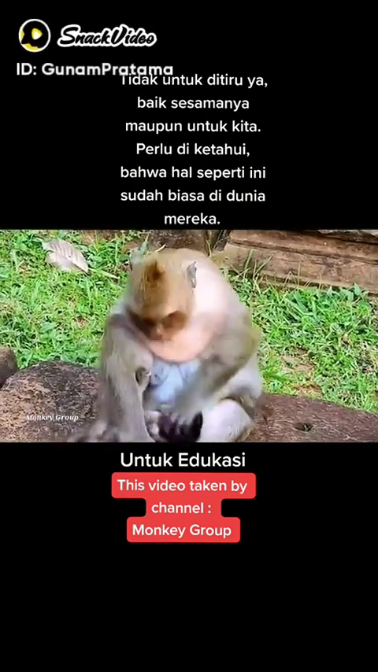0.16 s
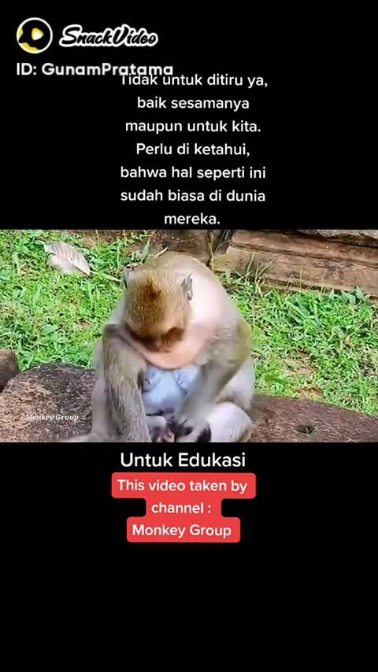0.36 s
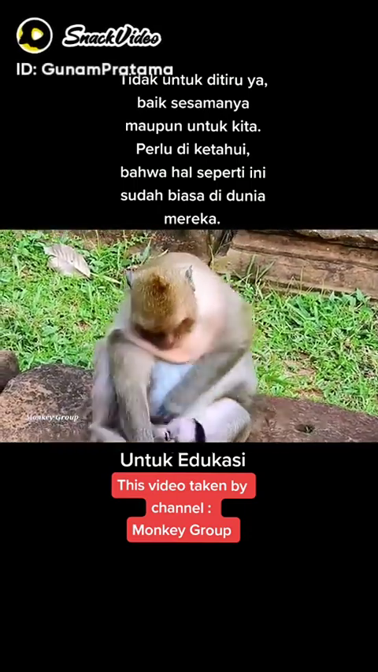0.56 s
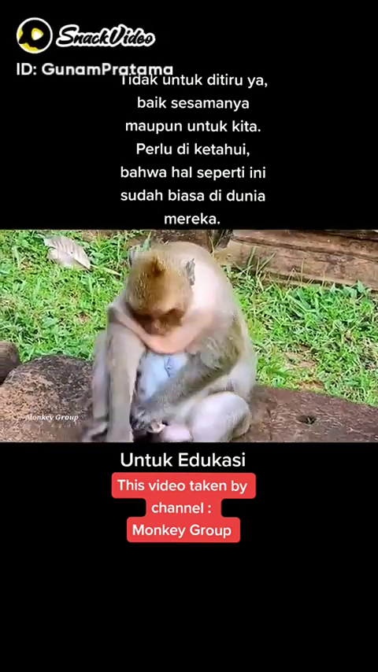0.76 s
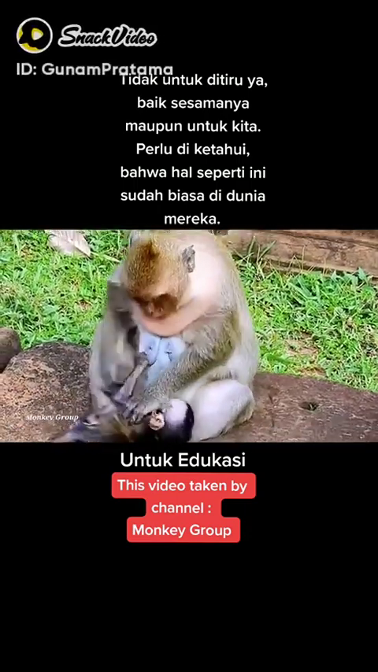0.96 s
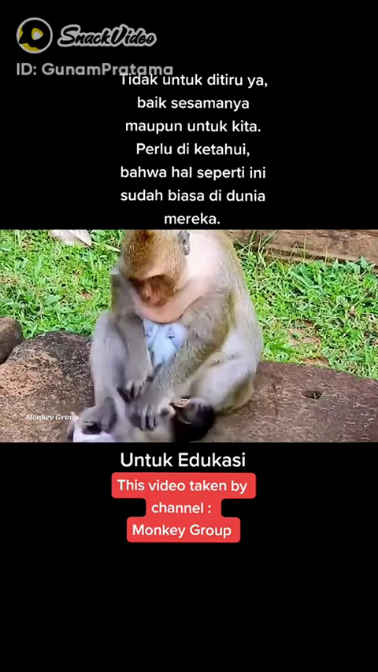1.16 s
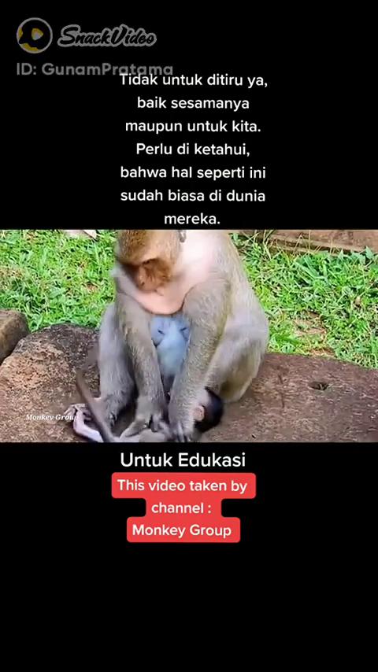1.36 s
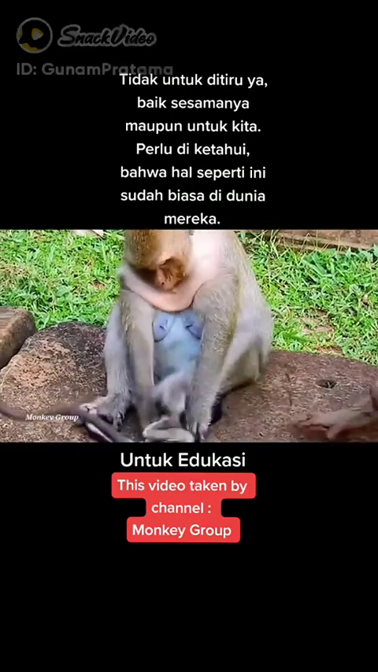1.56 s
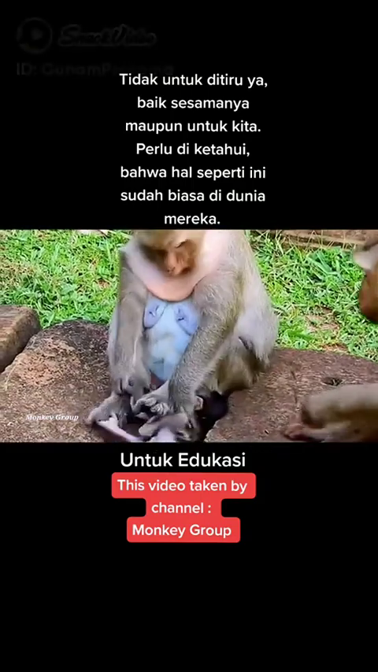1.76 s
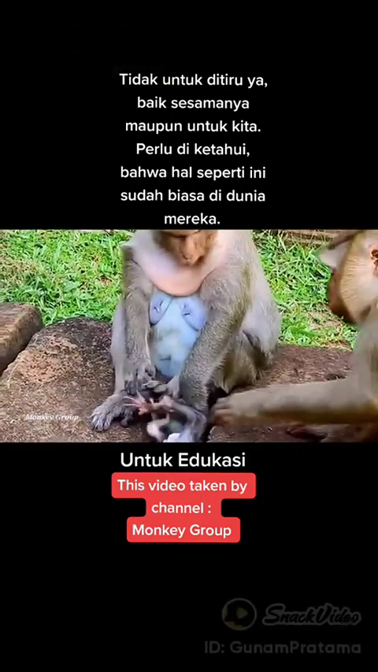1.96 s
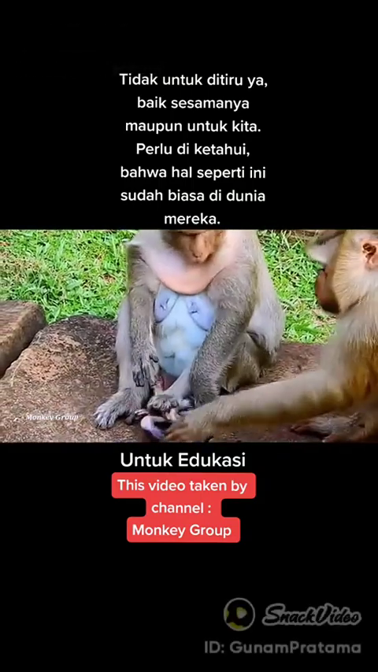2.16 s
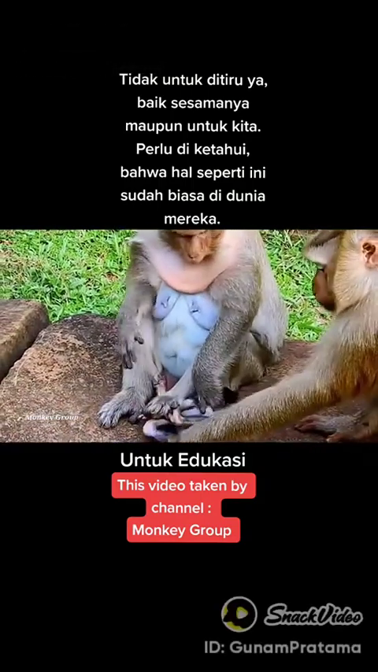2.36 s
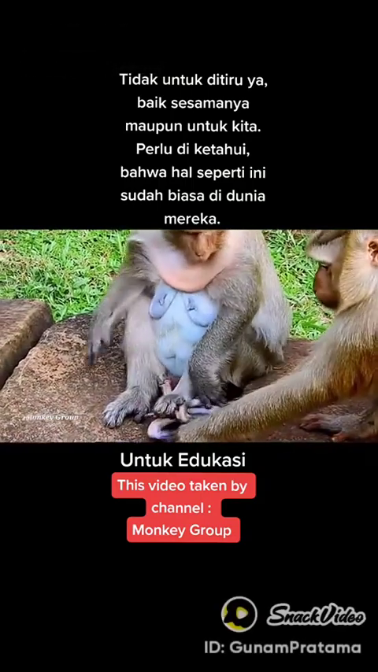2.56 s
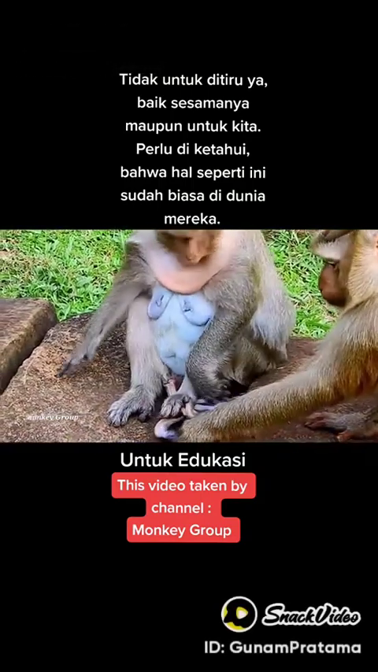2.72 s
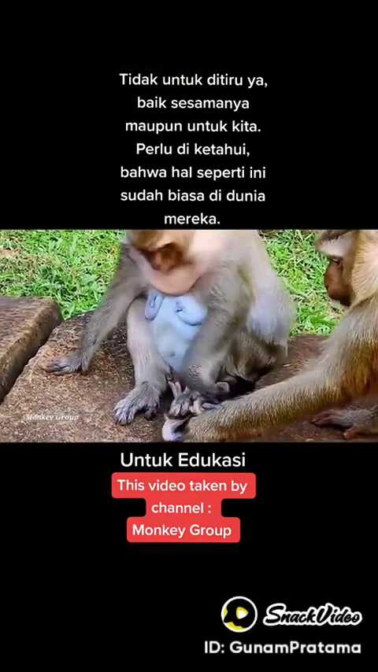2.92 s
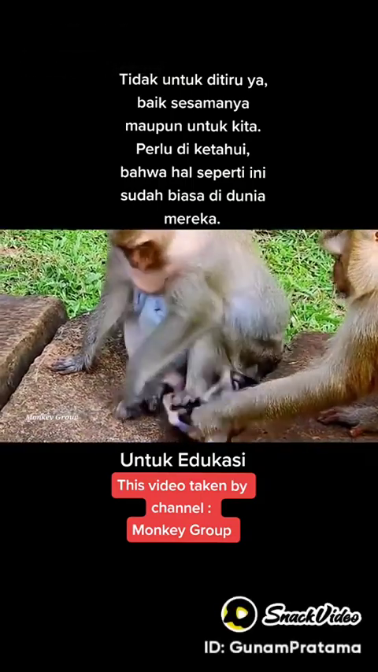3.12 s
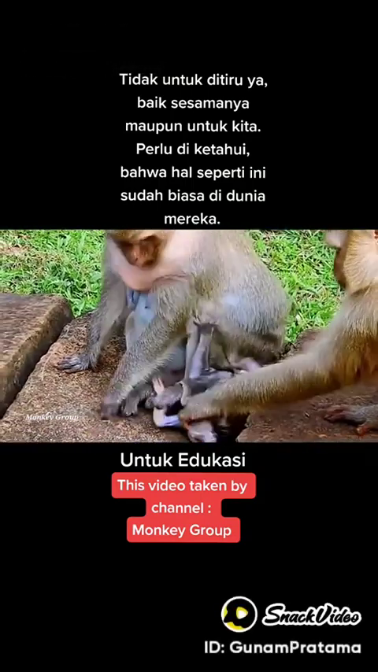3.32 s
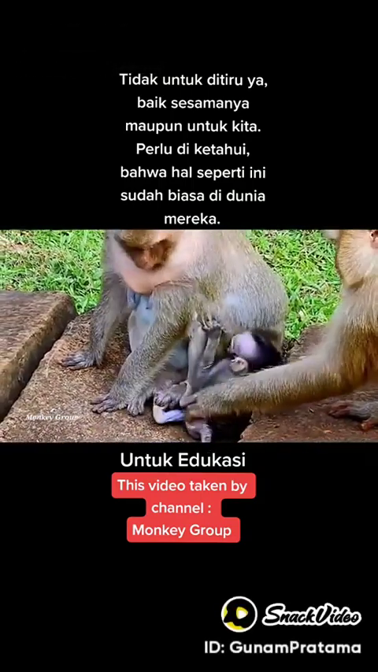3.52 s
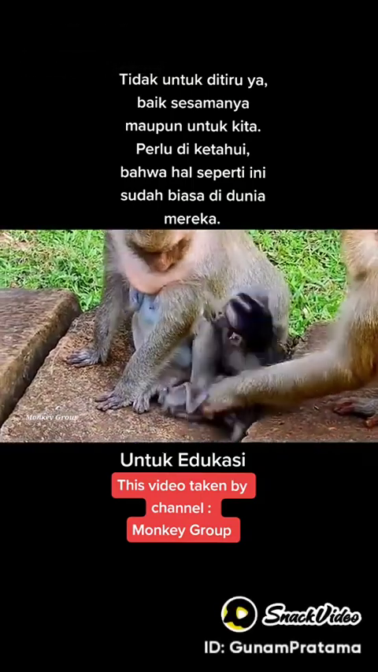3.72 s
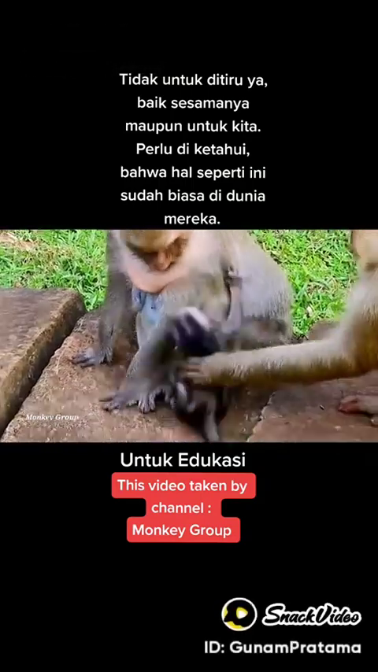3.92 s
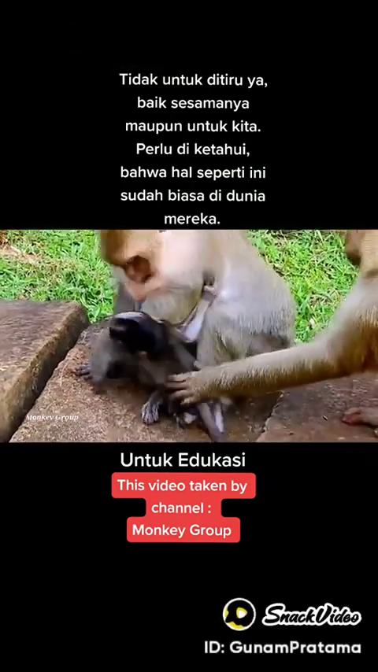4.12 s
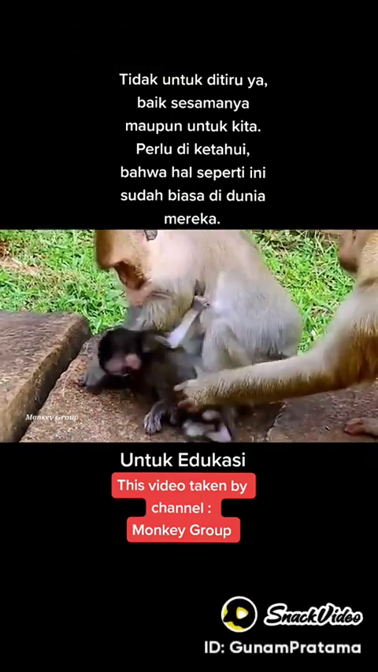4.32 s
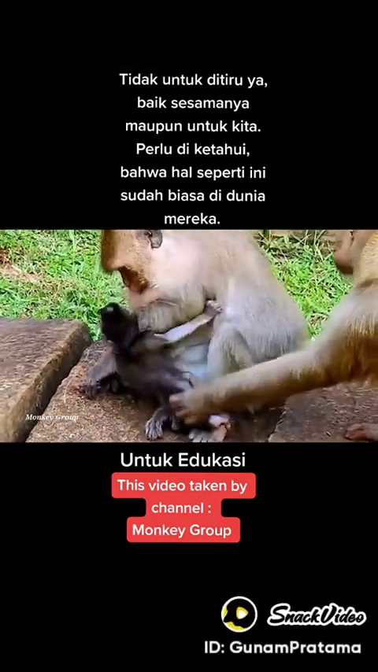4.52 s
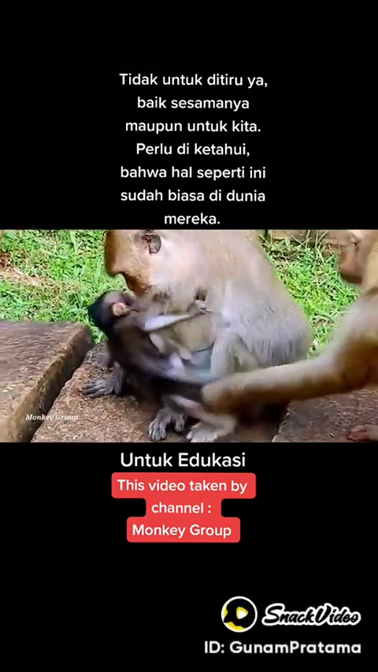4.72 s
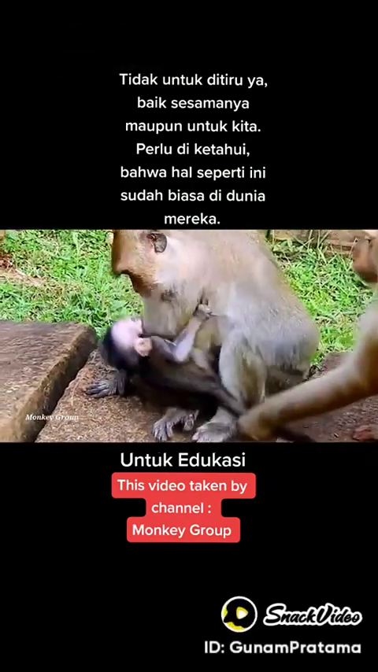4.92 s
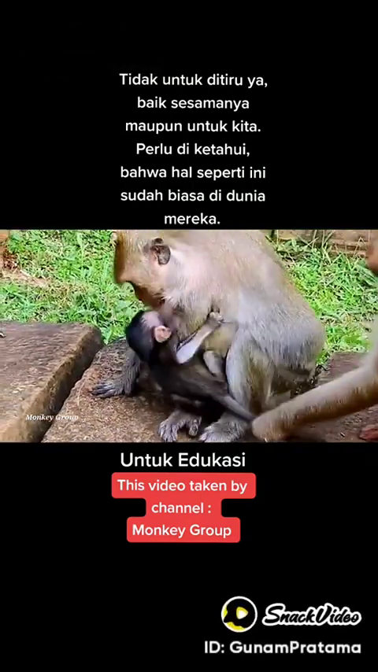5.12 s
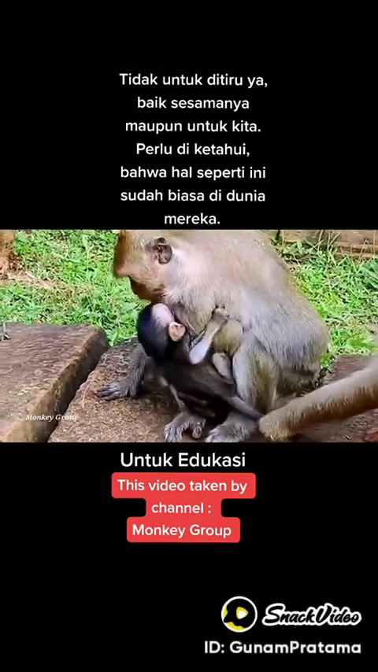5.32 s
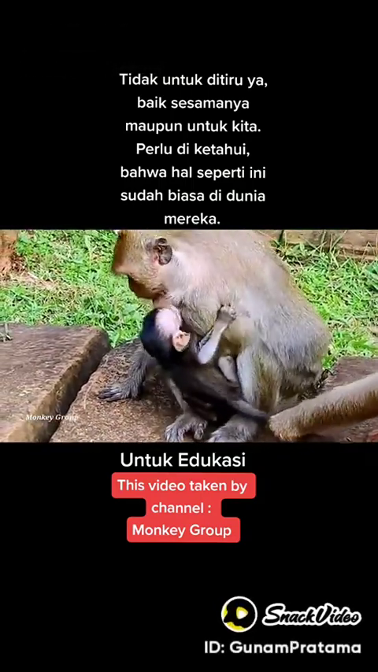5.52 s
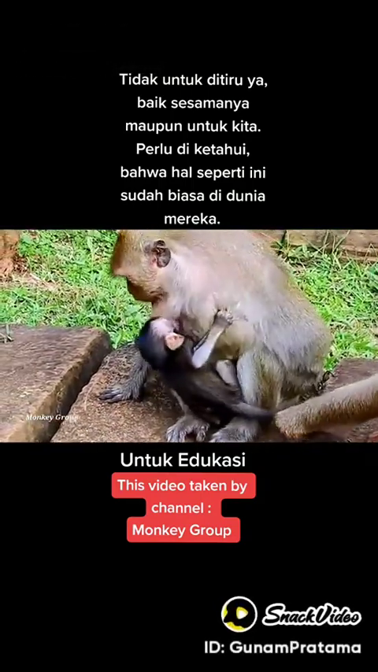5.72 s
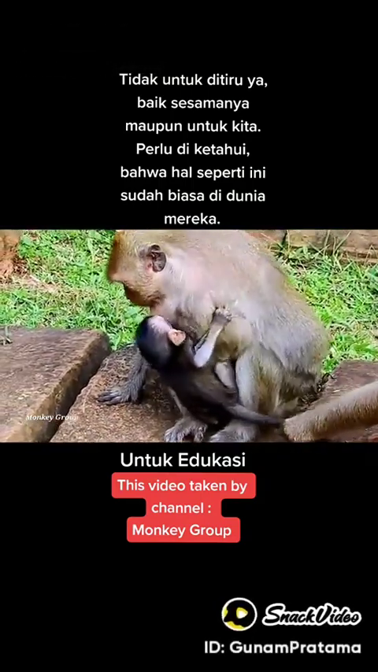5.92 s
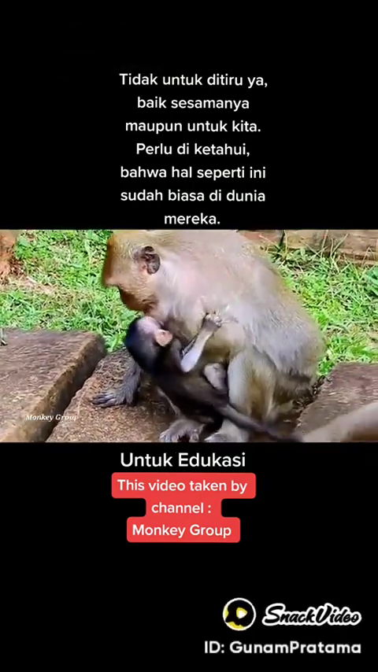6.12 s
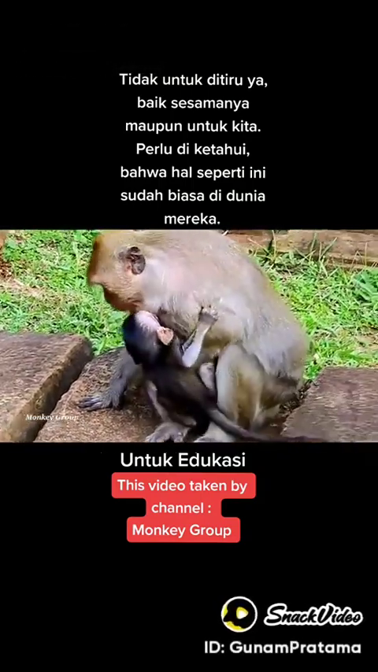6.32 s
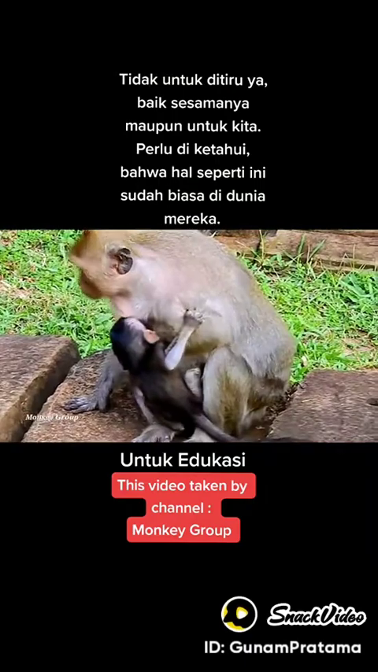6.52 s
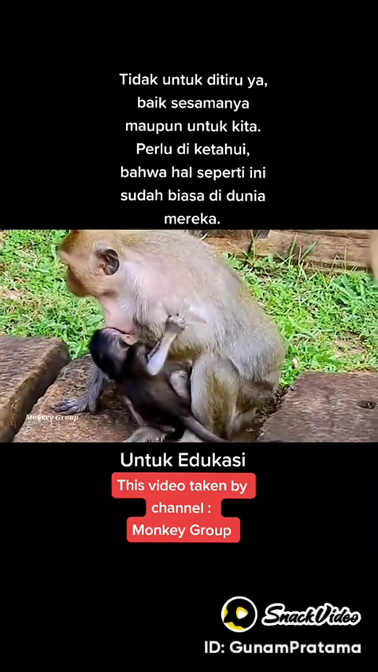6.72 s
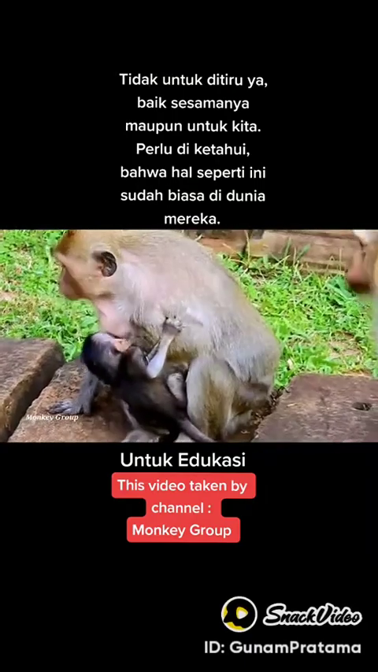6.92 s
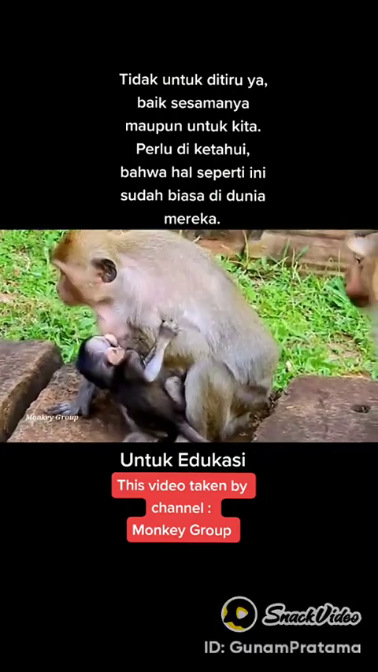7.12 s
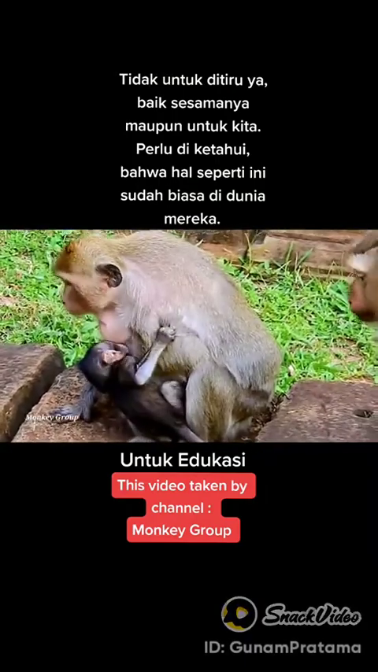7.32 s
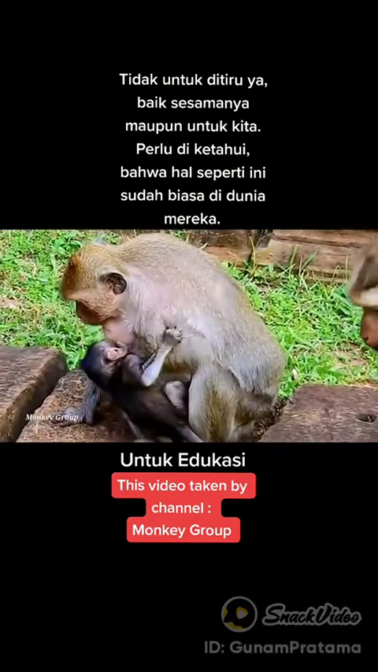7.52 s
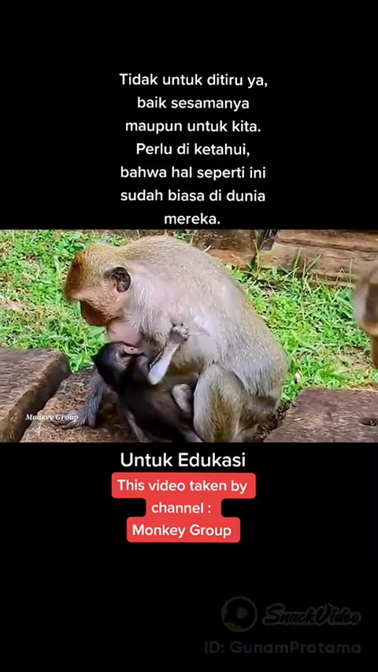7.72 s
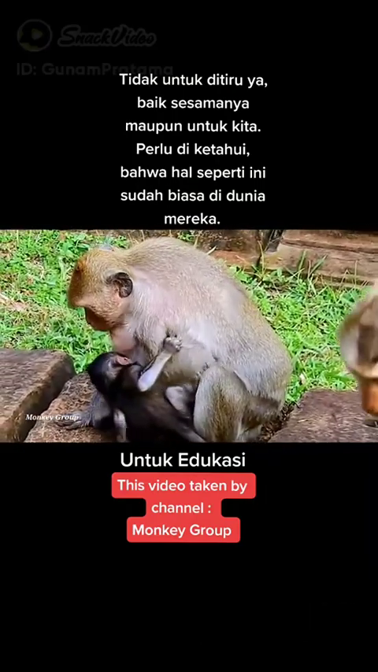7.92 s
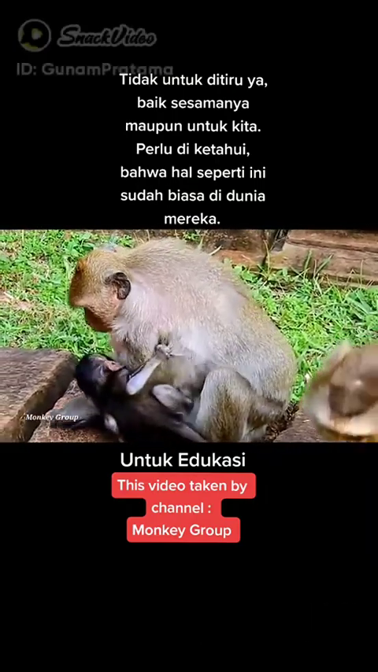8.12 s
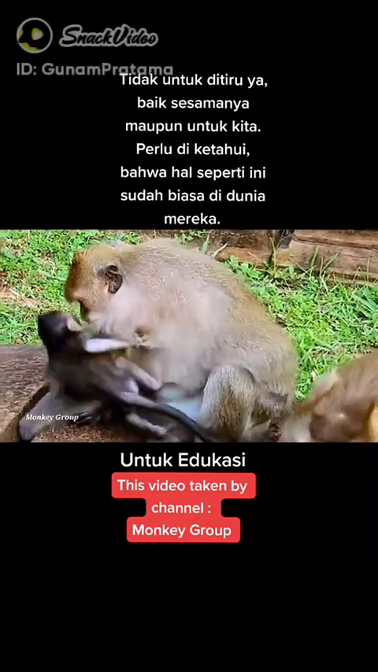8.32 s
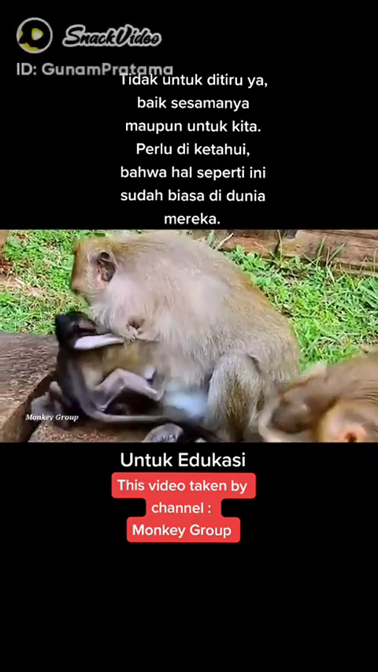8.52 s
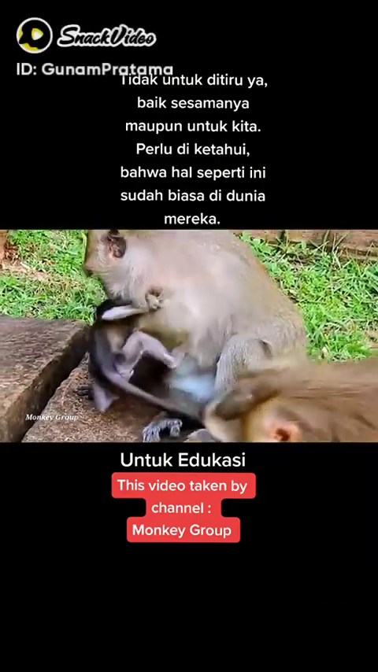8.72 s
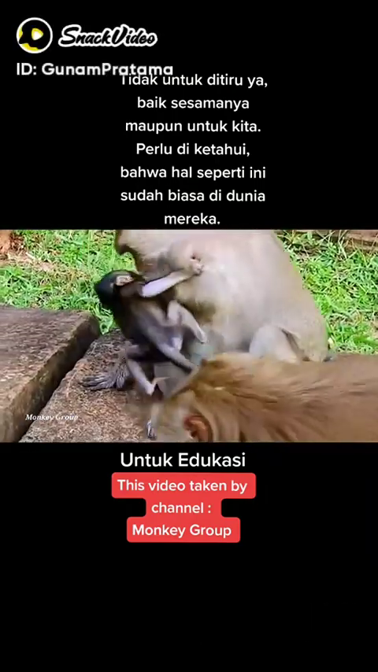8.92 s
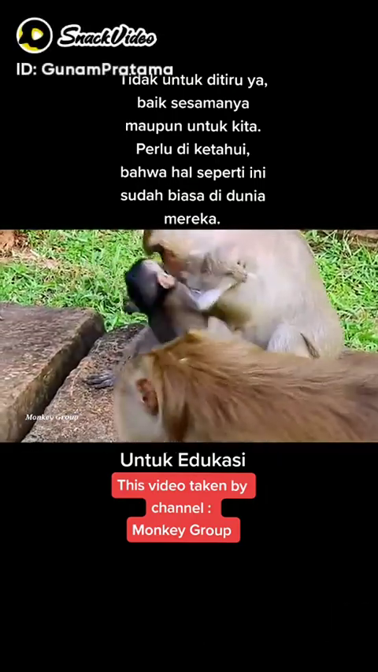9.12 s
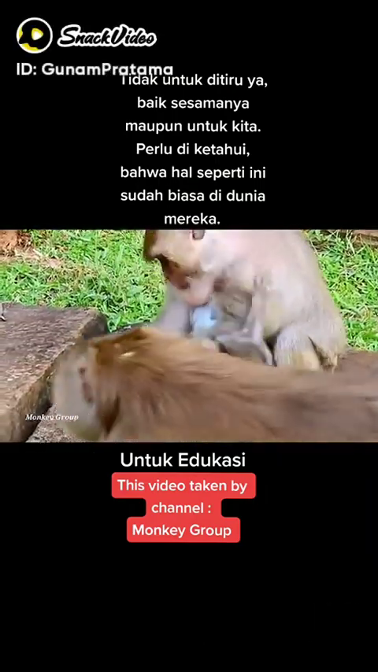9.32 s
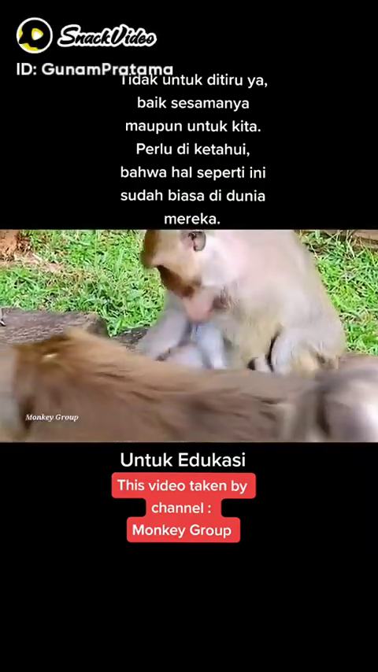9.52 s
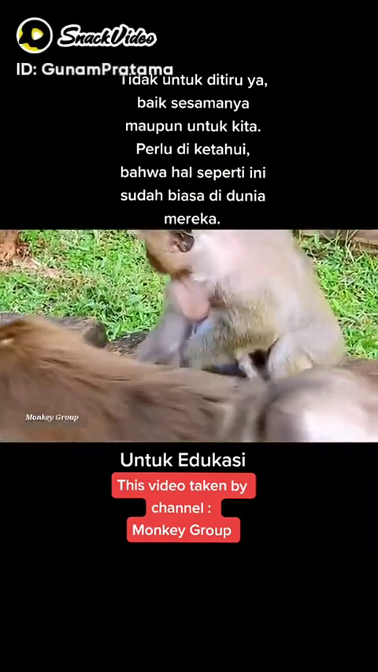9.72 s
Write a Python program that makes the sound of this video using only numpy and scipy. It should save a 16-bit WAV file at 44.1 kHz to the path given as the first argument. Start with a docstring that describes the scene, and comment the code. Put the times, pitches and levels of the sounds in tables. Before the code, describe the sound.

Very high, strained squeals of a distressed infant monkey burst out, subside into small yelps and coos, then return harshly over quiet outdoor rumble.

```python
"""A stone terrace outdoors: a baby monkey, held down by an adult, screams in bouts close to the microphone.
Its voice is one very high whistle that smears into sidebands and breaks into bursts of noise as it strains.
Short shrieks, lower undertones and faint blurred tones surround the screams; between bouts it yelps and coos.
The adult's grunts, two short broadband knocks and faint shuffles are swells and blows shaped by fixed spectra.
Decaying noise makes the echo of the stone, and fur rubs over a quiet outdoor rumble."""
import sys
import numpy as np
from scipy import signal
from scipy.fft import rfft, irfft, next_fast_len
from scipy.io import wavfile
from scipy.ndimage import uniform_filter1d, minimum_filter1d

SR = 44100
rng = np.random.default_rng(int(sys.argv[2]) if len(sys.argv) > 2 else 0)


def generate_wav(signal):
    """Clip the signal to [-1, 1] and save it as 16-bit WAV at the path in sys.argv[1]."""
    frames = np.transpose(np.atleast_2d(signal))
    scaled = np.clip(frames, -1, 1) * 32767
    pcm = np.round(scaled).astype(np.int16)
    wavfile.write(sys.argv[1], SR, pcm)


N = 434826
TIME = np.arange(N) / SR

# Long screams of the baby, close up. Each row: mouth hiss in dB, low rasp in dB relative to the voice,
# and a curve of effort whose points give time in seconds, pitch in Hz, level in dB, roughness (held to 0.13-1).
SCREAMS = [ (-43, -41, [(.18, 5200, -17, .85), (.21, 5500, -24, .85), (.24, 6150, -16, .65),
           (.29, 7000, -16.5, .85), (.325, 6100, -12.5, .65), (.36, 7020, -21, .9), (.405, 6500, -11, .85),
           (.445, 5200, -13, .55), (.475, 6058, -24, .85), (.572, 4720, -22, .45), (.602, 5030, -8.5, .75),
           (.635, 5730, -28.5, .95), (.685, 6700, -21.5, .88), (.735, 5250, -27.5, .55),
           (.785, 5510, -27, .55)]), (-48.5, -40, [(.815, 4500, -40.5, .7), (.88, 4170, -28.5, .3),
           (.938, 4350, -19, .6)]), (-53, -35.5, [(1.155, 4397, -30, .5), (1.195, 5007, -16, .15),
           (1.25, 5650, -18, .55), (1.372, 6150, -20, .45), (1.397, 5793, -29, .65), (1.41, 5450, -10, 0.2),
           (1.462, 5618, -28, .35), (1.494, 5819, -16.5, .45), (1.503, 5765, -17, .45),
           (1.535, 5457, -25, .4), (1.59, 5400, -18.5, .45), (1.65, 5460, -18.5, 0), (1.7, 5666, -18, .55),
           (1.775, 5600, -26.5, .72), (1.905, 5067, -20.5, 0.6)]), (-54.5, -24.5, [(1.945, 5167, -30, .45),
           (1.988, 4958, -18, .35), (2.04, 5100, -20.5, 0.5), (2.11, 5594, -19.5, 0.5),
           (2.225, 5410, -29.5, .85)]), (-52, -22, [(2.584, 6200, -14, .6), (2.612, 6000, -12, 1),
           (2.65, 5610, -12, .65), (2.708, 4484, -11.5, .65), (2.724, 5600, -7.5, .3),
           (2.734, 5980, -15.5, .7)]), (-43.5, -22.5, [(3.5, 4860, -32.5, 0.77), (3.532, 4834, -12.5, 0.61),
           (3.568, 3935, -18.5, 0.74), (3.608, 6090, -13.5, 1.1), (3.672, 5110, -8.5, 0.14),
           (3.685, 4440, -18, 0.8)]), (-48, -26.5, [(3.86, 5700, -45, .7), (3.905, 5600, -33.5, .55),
           (3.935, 5300, -48.5, .6), (3.965, 5040, -24, .45), (4.025, 5580, -44, .7), (4.07, 6200, -32, .6),
           (4.129, 5320, -24.5, .45), (4.136, 5450, -14.5, .2), (4.16, 5580, -16, .1),
           (4.208, 5140, -14.5, .15), (4.224, 5820, -19.5, 1), (4.255, 5900, -15.5, .75),
           (4.3, 4830, -20, 1), (4.325, 3235, -14, .75), (4.345, 3500, -22.5, .85)]),
           (-41, -31.5, [(4.585, 4950, -47, .1), (4.645, 5404, -37, .45), (4.68, 4060, -25, .7),
           (4.73, 3970, -11, .8), (4.77, 5700, -24.5, .98), (4.815, 4800, -9, .7), (4.84, 5050, -30.5, .8),
           (4.85, 4930, -10.5, .2), (4.875, 5330, -17, .15), (4.9, 5168, -13, .12), (4.922, 5450, -20, .15),
           (4.951, 5330, -26.5, .25), (5.023, 5186, -19.5, .2), (5.05, 4810, -23.5, .8)]),
           (-48, -21.5, [(8.385, 3554, -5, 0.52), (8.423, 4830, -10, 1.1), (8.439, 4260, -16, 0.53),
           (8.455, 6280, -19.5, 1.1), (8.598, 5710, -12.5, 0.89), (8.614, 5460, -10, 0.22),
           (8.645, 4730, -9, 0.8)]), (-56, -22, [(8.832, 3950, -13.5, 0.3), (8.852, 4198, -7.5, 0.4),
           (8.885, 5410, -13.5, .7), (8.91, 6400, -19, 1), (8.965, 6245, -15, 0.87),
           (9.035, 6000, -11.5, 0.5), (9.075, 4725, -11, 0.7), (9.107, 4550, -12, .7),
           (9.14, 3423, -17, 0.99)]), (-34, -26, [(9.418, 7100, -29, 0.4), (9.445, 3924, -31, 1),
           (9.486, 4300, -4.5, 0.3), (9.502, 4500, -28, 1), (9.518, 4323, -11, 0.7),
           (9.55, 4800, -24.5, .9)]), (-45, -28, [(9.578, 4950, -15.5, .35), (9.63, 5040, -19, 0.8),
           (9.655, 5100, -27.5, .85), (9.722, 5400, -24.5, .6), (9.85, 4760, -43.5, 0.5)])]
# Short shrieks, each one straight glide. Each row: start in seconds, length in seconds, start pitch in Hz,
# end pitch in Hz, level in dB, roughness (held to 0.13-1), mouth hiss in dB, low rasp in dB relative to the voice.
SHRIEKS = [(.029, 0.023, 5000, 5400, -13, 0.74, -52, -18), (.958, .007, 7010, 7700, -17, 0.6, -48.5, -36),
           (1.124, 0.014, 3450, 4300, -20, .98, -52.5, -33),
           (2.245, .028, 5700, 6055, -15.5, 1.2, -45.5, -19.5),
           (2.523, 0.015, 2900, 3904, -21.5, .4, -61, -7.5),
           (2.549, .016, 5850, 6360, -21.5, 1.23, -49.5, -13.5),
           (2.749, 0.017, 7550, 7420, -17, 0.2, -55.5, -13.5),
           (2.782, .046, 6060, 4940, -10.5, .45, -58, -29.5), (2.869, .03, 6060, 5360, -12, .6, -67, -24),
           (2.975, 0.006, 4440, 4160, -11.5, 0.38, -91, -24.5),
           (2.995, 0.0063, 5920, 5030, -25.5, 0.5, -77.5, -18.5),
           (3.338, 0.022, 5000, 4910, -13.5, 0.59, -46, -12.5),
           (3.356, 0.017, 4300, 4110, -6, 0.4, -40.5, -15),
           (3.431, 0.0043, 6400, 6400, -12, 0.39, -47, -11.5),
           (3.446, .034, 5550, 4900, -11, 0.8, -51.5, -23.5),
           (3.826, .008, 5150, 5120, -30, 0.55, -40, -22), (4.519, 0.046, 7700, 8290, -32, 0.3, -30.5, -40),
           (5.079, 0.0097, 3640, 3730, -13.5, 0.54, -51.5, -25),
           (7.738, .008, 6000, 5952, -65.5, .5, -84, -21.5),
           (9.366, 0.067, 6990, 6800, -41, .45, -47, -5.5)]
# A second, lower voice beside the whistle. Each row: start in seconds, length in seconds, start pitch in Hz,
# end pitch in Hz, level in dB before a common trim.
UNDERTONES = [(0.253, .1, 4127, 4040, -23), (2.548, .08, 4026, 3586, -26),
              (4.241, 0.088, 3683, 3317, -23.5), (4.687, 0.079, 3877, 4050, -19),
              (9.066, .065, 4030, 3258, -17.5), (9.428, 0.095, 3676, 3830, -21)]
# Faint blurred tones before and between the screams. Each row: start in seconds, length in seconds,
# start pitch in Hz, end pitch in Hz, start level in dB, end level in dB, blur in Hz.
BLURRED_TONES = [(0.002, 0.19, 5170, 5190, -34.5, -46.5, 970), (2.989, 0.35, 3250, 2730, -42, -45, 167.6),
                 (8.694, .12, 5390, 4974, -40, -36.5, 700)]
# Short yelps. Each row: start in seconds, length in seconds, start pitch in Hz, end pitch in Hz,
# level in dB before the final colouring, roughness (about 0-1), octave in dB relative to the tone.
YELPS = [(0.009, 0.016, 2381, 2150, -38, 0.3, -10), (2.236, 0.044, 2036, 1792, -35.5, 1.11, -11.5),
         (2.508, 0.042, 1610, 2558, -34.5, 0.43, -22.5), (3.247, 0.021, 1745, 1953, -34.5, 0.3, -24.5),
         (3.273, 0.012, 1997, 1470, -21, 0.06, -23.5), (3.839, 0.024, 2274, 1957, -44, 0.3, 2),
         (5.299, 0.023, 2202, 2444, -20, 0.09, -27), (5.312, 0.042, 3373, 3140, -23.5, 0.84, -21.5),
         (5.334, 0.0089, 2253, 2167, -19, 0, -12), (5.396, .027, 2585, 2015, -16, 0.4, -48.5),
         (5.758, 0.033, 1935, 1725, -25, 0.35, -63), (6.313, 0.019, 1445, 1380, -34.5, 0.06, -4.5),
         (8.218, 0.028, 2648, 2276, -21.5, 0.18, -26), (8.239, 0.023, 2191, 1868, -25, 0.51, 10)]
# Soft coos. Each row: start in seconds, length in seconds, start pitch in Hz, end pitch in Hz, level in dB.
COOS = [(6.996, 0.024, 1053, 1080, -53), (7.071, 0.11, 1166, 1408, -47.5), (7.183, 0.031, 1426, 1410, -40),
        (7.296, 0.015, 1475, 1547, -37.5)]
# The adult's low grunts. Each row: peak time in seconds, level in dB, rise and fall time in seconds.
GRUNTS = [(.728, -49.5, 0.042), (.962, -41, 0.012), (1.32, -48.5, 0.023), (1.61, -44, .024),
          (1.835, -33.5, 0.015), (2.262, -60, 0.014)]
# Short broadband knocks, perhaps the microphone being handled. Each row: time in seconds,
# height of the blow in dB before it is coloured.
KNOCKS = [(0.404, -29.5), (8.394, -16)]
# Faint shuffling on the stone. Each row: peak time in seconds, level in dB, rise and fall time in seconds.
SHUFFLES = [(3.018, -58, 0.0051), (4.45, -60, 0.033), (5.63, -60, 0.036), (7.5, -61, 0.027),
            (7.8, -63.5, 0.016), (9.5, -59, 0.12)]

# Spectra of the baby's throat, its open mouth, the rattle below the whistle and the rasp of its yelps.
# Each row: frequency in Hz, level in dB.
THROAT = [(500, -58), (1100, -44.5), (1600, -35.5), (2600, -28), (3100, -30.5), (3900, -4), (5000, -1.5),
          (6300, 7.5), (6750, -1.5), (7700, 5), (8300, -21.5), (9500, -36)]
MOUTH_HISS = [(7400, -35.5), (8200, -2.5), (9000, 0.5), (10200, 1.5), (10600, -18.5), (11200, -15.5),
              (11900, -5), (12300, -21), (14400, -11), (15500, -17)]
LOW_RASP = [(800, -37), (1400, -16.5), (2000, -6), (3000, -1), (3600, 8), (4300, -21.5)]
YELP_RASP = [(700, -26), (1500, -17), (2400, -4), (4000, 11), (5300, -14.5), (6400, 0.5), (7700, -8),
             (8600, -33)]
# Spectra of the adult's throat, the knock's colour, the shuffled stone and the outdoor air.
# Each row: frequency in Hz, level in dB.
GRUNT_THROAT = [(100, -15), (300, -22), (550, -12.5), (830, 1.5), (1100, -7), (1600, -10.5), (2500, -20.5),
                (5000, -64)]
KNOCK_COLOUR = [(30, -3), (150, -5), (800, 2), (1500, 10.5), (4000, -23), (12000, -16)]
SHUFFLE_BODY = [(200, -12), (600, -1.5), (1400, 5.5), (2500, -11.5), (6000, -21.5), (12000, -34)]
AIR = [(20, -34), (45, -18), (90, -2), (150, -1), (220, -12.5), (350, -20), (650, -22.5), (1200, -16.5),
       (2200, -23.5), (4500, -38), (7500, -33), (9000, -46.5), (15000, -48)]
# Colour of the whistle, of whole yelps, of rubbed fur and of the scatter's left-right difference.
# Each row: frequency in Hz, level in dB.
WHISTLE_COLOUR = [(1500, -13.0), (3000, -20), (3600, -6.5), (8000, 3), (9500, -17.5)]
YELP_COLOUR = [(700, -14.5), (1400, -8.5), (4400, -3.5), (5300, -16.0), (6200, 2), (7700, -3.5), (8800, -27)]
FUR = [(50, -4.5), (140, 12.0), (260, -5.0), (1200, 0), (3000, -20.0), (9000, -29)]
SCATTER_SIDE = [(300, -19), (2500, -35.5), (5000, -14), (9000, -16.5), (13000, -13.5)]
# How hard the animals struggle. Each row: time in seconds, struggle from 0 to 1.
STRUGGLE = [(0, 0.67), (1.4, 0.8), (1.9, 1), (2.3, 0.048), (4.4, 0.23), (6, 0.051), (7.6, 0.17), (8.6, 0.33), (9.8, 0.65)]
# The terrace's echo. Each row: band centre in Hz, time to fall by 60 dB in seconds, level in dB.
TERRACE = [(250, 0.21, -14.5), (700, 0.13, -2.5), (1500, 0.63, -14), (2850, 0.22, -9), (4400, 0.083, -9),
           (8700, 0.28, -12)]

ATTACK_S, RELEASE_S = 0.0023, .008  # time constants with which screams and shrieks open and die away
THROB_DB, THROB_HZ = 1.03, 44.8  # the breath pressure of a scream is unsteady
WANDER_HZ, WANDER_RATE_HZ = 68, 15  # and so is its pitch
# mouth hiss: dB per dB of voice over its usual level, dB more at full roughness, usual level in dB
HISS_FOLLOW, HISS_STRAIN_DB, USUAL_DB = .35, 19.5, -21
TOP_HZ = 15750  # upper edge of the recorder's passband


def screams(jitter_hz=170, quaver_hz=40, lurch_hz=480, flutter_db=6, burst_db=-1.0, smear_hz=620,
            smear_share=0.47, chaos_share=0.85, chaos_power=5.0, octave_db=-5, hiss_trim_db=-1):
    """Tiny vocal folds whistle; strain smears the whistle into sidebands, then into bursts that fill the throat."""
    hz, rough, voice_gain, hiss_gain, rasp_gain = effort()
    quaver = quaver_hz * walk(78)
    lurch = lurch_hz * rough ** 2 * walk(60)
    jitter = jitter_hz * rough * walk(420)
    phase = turn(hz + quaver + lurch + jitter)
    flutter = undb(flutter_db * rough * walk(130))
    flutter /= np.sqrt(uniform_filter1d(flutter ** 2, size=700))  # keeps the slower level even
    bursts = unit(undb(burst_db * walk(330)))

    # irregular beating of the folds throws sidebands that cling to the pitch
    sidebands = unit(walk(smear_hz) * np.sin(phase) + walk(smear_hz) * np.cos(phase))
    smear = smear_share * np.clip((rough / 0.64) ** 3.5, 0, 1)
    whistle = np.sqrt(2 * (1 - smear)) * flutter * np.sin(phase) + np.sqrt(smear) * sidebands
    whistle = colour(whistle, WHISTLE_COLOUR)
    chaos = chaos_share * rough ** chaos_power
    throat = bursts * patchy(THROAT, patch_db=8.5, patch_hz=44.6)
    voice = np.sqrt(1 - chaos) * whistle + np.sqrt(chaos) * throat

    # the open mouth lets out the octave together with rushing air
    octave = colour(flutter * np.sin(2 * phase), MOUTH_HISS) * undb(octave_db) * (1 - chaos)
    rush = undb(hiss_trim_db) * bursts * patchy(MOUTH_HISS, patch_db=11.5, patch_hz=18, count=14)
    # in the harshest screams the bursts also rattle the throat below the whistle
    rasp = bursts * noise(LOW_RASP)
    return voice_gain * voice + hiss_gain * (rush + octave) + rasp_gain * rasp


def effort():
    """Pitch, roughness and gains of voice, hiss and rasp; hiss and rasp grow with level and strain."""
    calls = [[(*point, hiss_db, rasp_db) for point in points] for hiss_db, rasp_db, points in SCREAMS]
    calls += [glide(*row) for row in SHRIEKS]
    envelope, hz, db, rough, hiss_db, rasp_db = play(calls, ATTACK_S, RELEASE_S)
    rough = np.clip(rough, .13, 1)
    hiss_db = hiss_db + HISS_FOLLOW * (db - USUAL_DB) + HISS_STRAIN_DB * rough
    pressure = envelope * undb(THROB_DB * walk(THROB_HZ))
    gains = pressure * undb([db, hiss_db, db + rasp_db])
    voice_gain, hiss_gain, rasp_gain = uniform_filter1d(gains, size=90)  # 2 ms, against clicks
    wandering_hz = hz + WANDER_HZ * walk(WANDER_RATE_HZ)
    return wandering_hz, rough, voice_gain, hiss_gain, rough * rasp_gain


def undertones(width_hz=300, trim_db=-1, attack_s=0.0047, release_s=0.011):
    """Under most strain the two folds part ways, and one buzzes at its own lower pitch."""
    envelope, hz, db = play([glide(*row) for row in UNDERTONES], attack_s, release_s)
    return envelope * undb(db + trim_db) * blurred(hz, width_hz)


def blurred_tones(attack_s=.008, release_s=.015):
    """Faint tones before and between the screams, each a band of noise around a gliding pitch."""
    out = 0
    for start, length, start_hz, end_hz, start_db, end_db, width_hz in BLURRED_TONES:
        call = [(start, start_hz, start_db), (start + length, end_hz, end_db)]
        envelope, hz, db = play([call], attack_s, release_s)
        out = out + envelope * undb(db) * blurred(hz, width_hz)
    return out


def yelps(jitter_hz=520, flutter_db=6, rasp_db=-3, edge_s=.004):
    """Short, low, hoarse notes: a tone, its octave and a rasp that grows with roughness."""
    out = np.zeros(N)
    wobble, flutter, rasp = walk(510), walk(260), noise(YELP_RASP)
    for start, length, start_hz, end_hz, db, rough, octave_db in YELPS:
        t = np.arange(int((length + edge_s) * SR)) / SR
        span = slice(int(start * SR), int(start * SR) + len(t))
        hz = np.interp(t, [0, length], [start_hz, end_hz])
        phase = turn(hz + jitter_hz * rough * wobble[span])
        tone = np.sin(phase) + undb(octave_db) * np.sin(2 * phase)
        tone = unit(tone * undb(flutter_db * rough * flutter[span]))
        hoarse = tone + undb(rasp_db) * rough ** 2 * rasp[span]
        edges = np.clip(np.minimum(t, t[-1] - t) / edge_s, 0, 1)
        out[span] += undb(db) * hoarse * edges
    return colour(out, YELP_COLOUR)


def coos(second_db=-15, third_db=-21, waver=0.013, attack_s=0.0064, release_s=0.0059):
    """Soft, mostly rising whimpers on a clean pitch; higher pitches carry weaker overtones."""
    envelope, hz, db = play([glide(*row) for row in COOS], attack_s, release_s)
    phase = turn(hz * (1 + waver * walk(98)))
    bright = undb(np.interp(hz, [1100, 1500], [7, -10]))
    overtones = undb(second_db) * np.sin(2 * phase) + undb(third_db) * np.sin(3 * phase)
    level = uniform_filter1d(envelope * undb(db), size=300)
    return level * np.sqrt(2) * (np.sin(phase) + bright * overtones)


def grunts():
    """Low swells of grainy noise through the adult's throat."""
    return puffs(GRUNTS, GRUNT_THROAT, grain_db=2, grain_hz=119.6)


def knocks(push_s=.0004, rattle_db=-25, rattle_s=.018):
    """Short broadband knocks: a sudden push and a weaker noisy rattle, both dying away, through one colour."""
    out = np.zeros(N)
    t = np.arange(SR // 5) / SR
    for at, db in KNOCKS:
        push = np.exp(-t / push_s)
        rattle = undb(rattle_db) * np.exp(-t / rattle_s) * rng.standard_normal(len(t))
        out[int(at * SR):int(at * SR) + len(t)] += undb(db) * (push + rattle)
    return colour(out, KNOCK_COLOUR)


def shuffles():
    """Faint swells of grainy noise as the stone is brushed."""
    return puffs(SHUFFLES, SHUFFLE_BODY, grain_db=-1.0, grain_hz=204.5)


def terrace(x, early_s=0.0065, near_db=-17, side_db=-11.5, far_db=-29, far_t60_s=0.24):
    """Nearby stone scatters the sound, the treble differently to each side; walls and trees add a faint tail."""
    t = np.arange(int(.8 * SR)) / SR
    centres = np.log([row[0] for row in TERRACE])
    bins = np.log(np.maximum(np.fft.rfftfreq(len(t), 1 / SR), 1))
    tail = np.zeros((2, len(t)))  # middle and side
    for pick, (_, t60, db) in zip(np.eye(len(TERRACE)), TERRACE):
        decay = np.exp(-np.log(1000) * t / t60) * np.minimum(t / 0.0091, 1)
        band = irfft(rfft(rng.standard_normal(tail.shape)) * np.interp(bins, centres, pick), len(t))
        tail += undb(db) * band * decay / np.linalg.norm(decay)
    scatter = t * np.exp(-2 * t / early_s)
    early = rng.standard_normal(tail.shape) * scatter / np.linalg.norm(scatter)
    mid = tail[0] + undb(near_db) * early[0]
    side = undb(side_db) * tail[1] + colour(early[1], SCATTER_SIDE)
    fading = np.exp(-np.log(1000) * t / far_t60_s) * np.minimum(t / 0.02, 1)
    far = undb(far_db) * rng.standard_normal(tail.shape) * fading / np.linalg.norm(fading)
    echo = np.array([mid + side, mid - side]) + far
    return signal.fftconvolve(x[None], echo, axes=1)[:, :N]


def fur(scuffle_db=-61, sway_db=0.87):
    """Fur rubs on stone, louder the harder the animals struggle."""
    struggle = np.interp(TIME, *np.transpose(STRUGGLE))
    return struggle * undb(scuffle_db + sway_db * walk(4)) * noise(FUR)


def air(mid_db=-66.5, side_db=-81.5, swell_db=2):
    """Far outdoor rumble that swells slowly, nearly alike in both ears."""
    mid = undb(mid_db + swell_db * walk(2.1)) * noise(AIR)
    side = undb(side_db) * noise(AIR)
    return mid + np.array([side, -side])


def puffs(table, spectrum, grain_db, grain_hz):
    """Swells of grainy noise through one fixed body."""
    swell = sum(undb(db) * np.exp(1 - np.hypot(1, (TIME - at) / width)) for at, db, width in table)
    grain = unit(undb(grain_db * walk(grain_hz)))
    return swell * grain * noise(spectrum)


def glide(start, length, start_hz, end_hz, *held):
    """A call whose pitch slides evenly while its other controls hold."""
    return [(start, start_hz, *held), (start + length, end_hz, *held)]


def play(calls, attack_s, release_s):
    """Envelope and control curves of calls (s, control, ..); where two meet, the one further open takes over."""
    curves = np.zeros((len(calls[0][0]), N))
    for call in calls:
        at, *controls = np.transpose(call)
        first = max(int((at[0] - 8 * attack_s) * SR), 0)
        span = slice(first, int((at[-1] + 8 * release_s) * SR))
        t = TIME[span]
        opening = np.maximum(at[0] - t, 0) / attack_s
        closing = np.maximum(t - at[-1], 0) / release_s
        envelope = np.exp(-opening - closing)
        own = [envelope] + [np.interp(t, at, control) for control in controls]
        curves[:, span] = np.where(envelope > curves[0, span], own, curves[:, span])
    return curves


def turn(hz):
    """Phase of an oscillator that follows a pitch curve."""
    return 2 * np.pi * np.cumsum(hz) / SR


def blurred(hz, width_hz):
    """A tone of rms about 1, smeared into a band around its pitch."""
    phase = turn(hz)
    return walk(width_hz) * np.sin(phase) + walk(width_hz) * np.cos(phase)


def patchy(spectrum, patch_db, patch_hz, count=22):
    """Noise whose neighbouring bands swell and fade on their own."""
    size = next_fast_len(N)
    whole = rfft(noise(spectrum), size)
    bins = np.fft.rfftfreq(size, 1 / SR)
    centres = np.linspace(spectrum[0][0], spectrum[-1][0], count)
    knots = np.arange(0, N / SR + 1, 1 / patch_hz)
    out = 0
    for pick in np.eye(count):
        band = irfft(whole * np.interp(bins, centres, pick), size)[:N]
        swell = undb(patch_db * rng.standard_normal(len(knots)))
        out = out + band * np.interp(TIME, knots, swell)
    return unit(out)


def walk(rate_hz, order=3):
    """Smooth chance of rms 1 that moves up to rate_hz."""
    lowpass = signal.butter(order, min(rate_hz, SR / 4), fs=SR, output="sos")
    return unit(signal.sosfilt(lowpass, rng.standard_normal(N)))


def noise(spectrum):
    """Coloured noise of rms 1."""
    return unit(colour(rng.standard_normal(N), spectrum))


def colour(x, spectrum):
    """Filter by a spectrum of (Hz, dB) points."""
    hz, db = np.transpose(spectrum)
    size = next_fast_len(len(x))
    bins = np.maximum(np.fft.rfftfreq(size, 1 / SR), 1)
    gain = undb(np.interp(np.log(bins), np.log(hz), db))
    return irfft(rfft(x, size) * gain, size)[:len(x)]


def unit(x):
    """Scale to rms 1."""
    return x / np.sqrt(np.mean(x ** 2))


def undb(db):
    """Decibels to gain."""
    return 10 ** (np.asarray(db) / 20)


def scene():
    """All near sounds sit straight ahead; the echo and the outdoor air spread to both sides."""
    baby = screams() + undertones() + yelps() + coos()
    near = baby + blurred_tones() + grunts() + knocks() + shuffles()
    return near + terrace(near) + fur() + air()


def record(dry, ceiling_db=-1):
    """A fast limiter holds down the highest peaks, and the recorder cuts the top."""
    room = np.minimum(1, undb(ceiling_db) / (np.abs(dry).max(axis=0) + 1e-9))
    gain = uniform_filter1d(minimum_filter1d(room, size=177), size=177)  # 4 ms windows
    lowpass = signal.ellip(10, .2, 70, TOP_HZ, fs=SR, output="sos")
    return signal.sosfilt(lowpass, dry * gain)


dry = scene()
out = record(dry)
generate_wav(out)
```